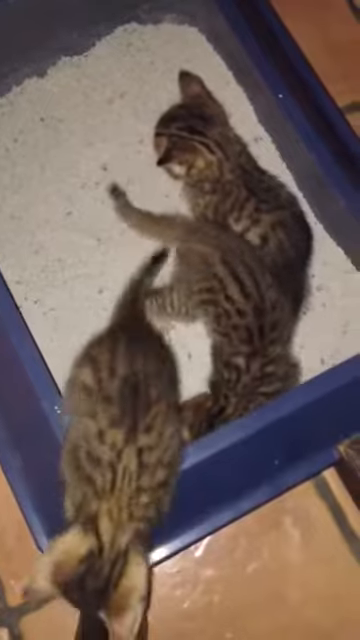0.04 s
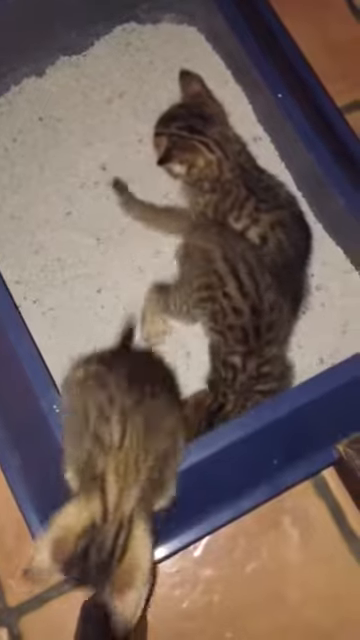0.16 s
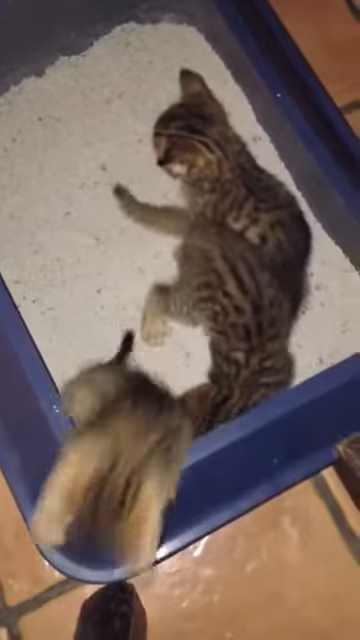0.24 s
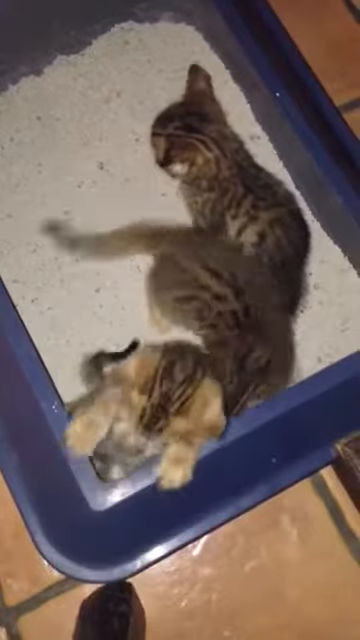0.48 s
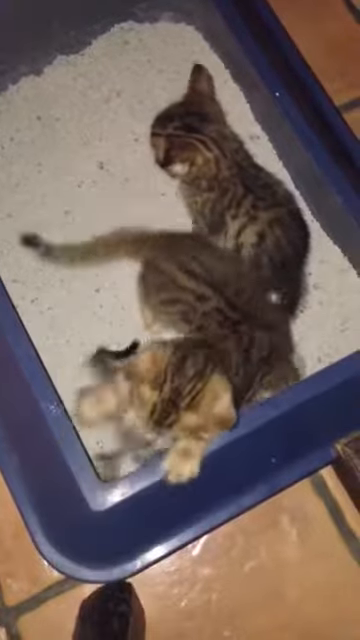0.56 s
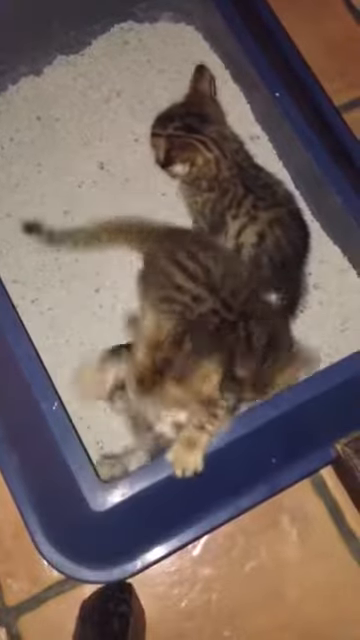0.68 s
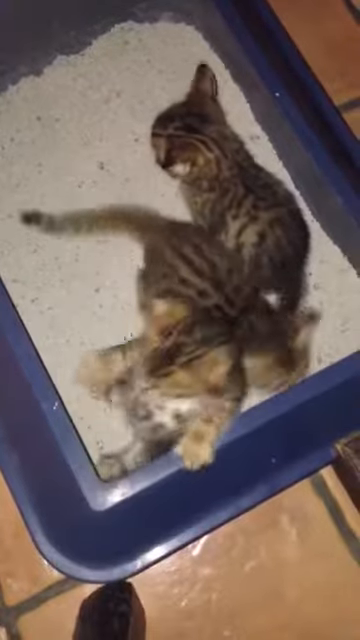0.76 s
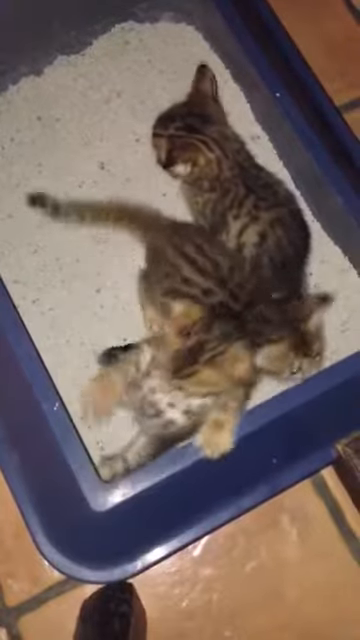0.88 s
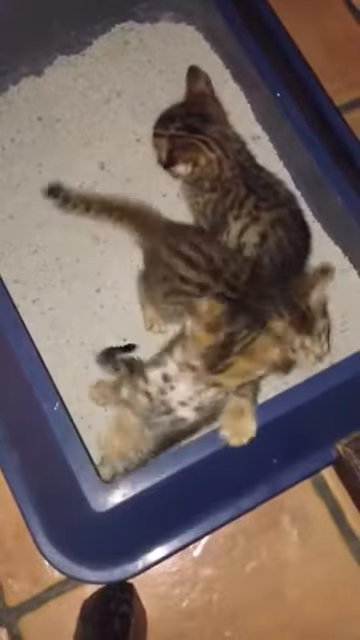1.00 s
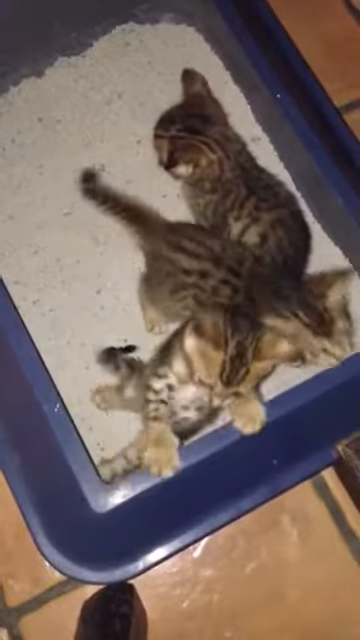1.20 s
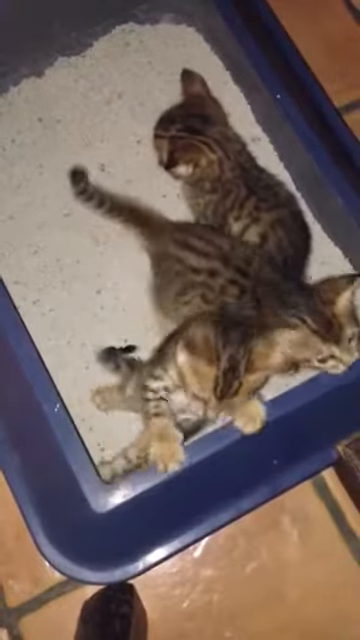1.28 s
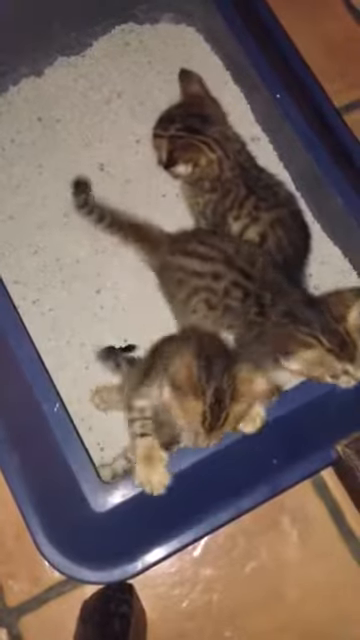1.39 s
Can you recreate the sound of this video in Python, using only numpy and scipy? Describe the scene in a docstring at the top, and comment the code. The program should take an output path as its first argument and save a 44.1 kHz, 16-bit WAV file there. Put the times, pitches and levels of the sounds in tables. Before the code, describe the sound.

Litter scuffs and plastic knocks as kittens tumble in their tray, over a low hum.

```python
"""A low hum fills a small tiled room; close to the microphone, litter scuffs in a plastic tray.
A kitten tumbles in, thumping the loaded tray floor, and wrestles with another.
Paws ring the thin wall, claws tick and rake, granules rub, crunch and drop, bodies bump softly.
The rustling goes on faintly over the hum, with a short echo off the tiles. Mono."""
import sys
import numpy as np
from scipy import signal
from scipy.fft import rfft, irfft, next_fast_len
from scipy.io import wavfile

SR = 44100
rng = np.random.default_rng(int(sys.argv[2]) if len(sys.argv) > 2 else 0)


def int16_out(signal):
    """Quantize to a 16-bit WAV file."""
    q = np.round(np.clip(np.atleast_2d(signal).T, -1, 1) * 32767)
    wavfile.write(sys.argv[1], SR, q.astype(np.int16))


N = 63945

# spectrum of the room air (frequency [Hz], relative level [dB])
AIR_COLOUR = [(20, -18), (45, -19), (100, -3.5), (160, -0.5), (280, 1.5), (500, -8.5), (1000, -11),
              (2000, -14), (4500, -14), (7500, -17.5), (10500, -21.5)]
# course of the deeper hum (time [s], level [dB])
DEEP_HUM_LEVEL = [(0, -55.5), (.2, -58.5), (.23, -66), (.32, -75), (.36, -62), (.53, -60), (.65, -70),
                  (.72, -56), (.8, -71.5), (.9, -67), (1.44, -63.5)]
# a light touch on the rim (time [s], level [dB])
RIM_CONTACT = (0.00098, -45.5)
# paws landing on the tray floor (time [s], thump level [dB], dull above [Hz], crunch level [dB])
PAW_LANDINGS = [(0.2240, -43.5, 825, -44), (0.2349, -27.5, 563, -40), (0.2497, -25, 1410, -35),
                (0.3375, -29.5, 127, -38.5)]
# paws and claws on the tray wall (time [s], knock level [dB], dull above [Hz], tick level [dB])
WALL_KNOCKS = [(0.5897, -37, 680, -49), (0.6685, -36.5, 2220, -20)]
# modes of the rim, loaded floor and thin wall (frequency [Hz], relative level [dB], t60 [s])
TRAY_RIM_MODES = [(368.5, -3.5, 0.22), (433, -3, 0.085)]
TRAY_FLOOR_MODES = [(112.8, -4, 0.13), (185, -21.5, 0.1), (255.4, -6, 0.27), (267, -13.5, 0.62),
                    (317.5, -14, 0.19), (361.3, -19.5, 0.54), (455.5, -8, 0.132), (534.6, 4.5, 0.041),
                    (575.6, -8, 0.26), (651, -10, 0.21), (858, -10.5, 0.064), (1029, -16.5, 0.11),
                    (1640, -7, 0.077)]
TRAY_WALL_MODES = [(188.3, -15.5, .55), (248, -0.5, 0.091), (315, -8, 0.14), (447, -2, 0.069),
                   (482, -5, .05), (670, -1.5, 0.024), (938, -3, 0.034), (1200, -2.5, 0.021),
                   (2280, 7, 0.033)]
# strokes through litter (peak time [s], level [dB], rise [s], fall [s], centre [Hz], width [octaves])
LITTER_SCUFFS = [(0.149, -56, 0.031, 0.009, 2600, 0.68), (0.200, -56.5, 0.045, 0.02, 900, 2.6),
                 (0.2417, -45, 0.0016, 0.0062, 4630, 0.95), (0.255, -41.5, 0.0044, 0.0075, 3540, 1.4),
                 (0.339, -41, 0.00093, 0.0052, 2170, 0.35), (0.3437, -35.5, 0.00052, 0.0027, 2280, 0.45),
                 (0.372, -52.5, 0.03, 0.031, 2600, 0.88), (0.407, -38, 0.024, 0.014, 2940, 0.69),
                 (0.447, -52.5, .012, 0.079, 4300, 0.59), (0.479, -52.5, 0.018, 0.019, 2400, 0.39),
                 (0.585, -54, 0.012, 0.011, 4200, .4), (0.593, -47.5, 0.011, 0.0074, 2130, 0.16),
                 (0.644, -54.5, 0.032, 0.058, 2440, 0.89), (0.699, -52.5, 0.012, 0.041, 3520, 0.35),
                 (0.930, -59.5, 0.024, 0.023, 3940, 0.42), (1.062, -58, 0.045, 0.039, 3840, 0.65),
                 (1.109, -59, 0.0092, 0.012, 3900, .6), (1.157, -57.5, 0.012, 0.0087, 3870, 0.68),
                 (1.224, -52.5, 0.011, 0.023, 3070, 1.12), (1.241, -45.5, 0.0025, 0.0084, 3360, 0.57),
                 (1.266, -52, 0.016, 0.014, 1820, 1.16), (1.340, -52.5, 0.0031, 0.011, 3050, 0.17),
                 (1.35, -51, 0.005, 0.007, 2700, 0.3), (1.361, -52.5, 0.018, 0.011, 3240, 0.68)]
# bodies meeting the litter bed (time [s], level [dB], width [s], centre [Hz])
BODY_BUMPS = [(0.179, -60, 0.021, 445), (0.352, -47.5, 0.022, 104.5), (0.405, -61.5, 0.035, 160),
              (0.935, -64.5, 0.033, 626), (1.056, -60, 0.028, 97), (1.172, -56, 0.022, 81),
              (1.275, -64, 0.0088, 646), (1.385, -64.5, 0.047, 87)]
# claws raking litter along the plastic (time [s], length [s], level [dB])
CLAW_RAKE = (0.4125, 0.0082, -30)
# resonances of that scrape (frequency [Hz], width [Hz], relative level [dB])
RAKE_RESONANCES = [(1328, 27, -7.5), (1880, 160, -3), (2320, 200, -6.5), (3320, 37, 1.5), (3230, 83, -2.5),
                   (4390, 245, 3), (5070, 25, -23), (4990, 86, -1), (6150, 710, -7), (8650, 940, -18)]
# reflections of a tick off the other tray walls (delay [s], relative level [dB])
TICK_ECHOES = [(.0032, -16), (.0075, -23.5), (0.0133, -26)]
# single granules dropping on plastic (time [s], level [dB])
GRANULE_DROPS = [(0.8757, -46.5), (0.893, -50.5), (1.066, -48), (1.114, -46.5), (1.131, -46)]
# spectra of rubbed litter, a crunch, a claw tick and a granule (frequency [Hz], relative level [dB])
LITTER_COLOUR = [(100, 14.5), (400, 12.5), (900, 9.5), (1400, 5.5), (2200, 4.5), (4500, 4), (7000, -1.5),
                 (9000, 2), (11000, -11)]
CRUNCH_COLOUR = [(60, -42), (250, 15), (700, 12), (1300, -5), (2300, 9), (3500, -6.5), (6000, -4.5),
                 (9000, -18), (11000, -25)]
TICK_COLOUR = [(60, -45), (250, -18), (900, 3.5), (1600, -8), (2400, -2), (3500, -5.5), (5000, -2),
               (6300, 3.5), (7600, -10.5), (9000, -0.5), (11000, -30)]
GRANULE_COLOUR = [(300, 7), (1500, -14.5), (3000, 0.5), (5000, -1), (7000, -9.5), (11000, -20)]
# reverberation of the tiled room (frequency [Hz], t60 [s])
ROOM_DECAY = [(100, 0.48), (400, 0.55), (1500, 0.28), (4500, 0.19), (10000, 0.31)]

BEND_DELAY_S, BEND_LEAD_S = 0.006, 0.0035  # bending-wave travel at 1 kHz; advance to meet the contact
BASS_LEAK_HZ = 135  # the open tray hardly radiates below this
LITTER_ROOM_DB, CLICK_ROOM_DB, TRAY_ROOM_DB = -8.5, -7, -14.5  # sends to the room


def amp(db):
    """Decibels to gain."""
    return 10 ** (np.asarray(db) / 20)


def unit(x):
    """Scales to rms 1."""
    return x / np.sqrt(np.mean(x ** 2) + 1e-20)


def read(points, hz):
    """Reads a table on a log-frequency axis."""
    f, value = np.transpose(points)
    return np.interp(np.log(hz + 1), np.log(f + 1), value)


def shaped(x, response):
    """Filters x by a function of frequency."""
    size = next_fast_len(2 * N)
    return irfft(rfft(x, size) * response(np.fft.rfftfreq(size, 1 / SR)), size)[:N]


def noise(response):
    """Noise of rms 1, coloured by a function of frequency."""
    return unit(shaped(rng.standard_normal(N), response))


def hump(f, centre_hz, octaves):
    """A bell-shaped band on a log-frequency axis."""
    return np.exp(-0.5 * (np.log2((f + 1) / centre_hz) / octaves) ** 2)


def lowpass(f, cutoff_hz):
    """Gain that falls 12 dB an octave above the cutoff."""
    return (1 + (f / cutoff_hz) ** 4) ** -0.5


def since(s):
    """Seconds since the moment s, for every sample."""
    return np.arange(N) / SR - s


def hum(hz, waver=0.4, waver_hz=11):
    """A low tone that wavers in level and pitch."""
    slow = lambda f: np.exp(-(f / waver_hz) ** 2)
    swell, slip = waver * noise(slow), waver * noise(slow)
    return unit((1 + swell) * np.sin(2 * np.pi * hz * since(0) + slip))


def room_tone():
    """Steady air around the microphone and two low hums, the deeper one coming and going."""
    air = amp(-60.5) * noise(lambda f: amp(read(AIR_COLOUR, f)))
    deep_db = np.interp(since(0), *np.transpose(DEEP_HUM_LEVEL))
    return air + amp(deep_db) * hum(hz=56) + amp(-66.5) * hum(hz=99.2)


def paw_blow(s, db, modes, dull_hz):
    """A soft paw rings the plastic; low bending waves travel slowest, so the bass comes last."""
    t = np.maximum(since(s), 0)
    ring = sum(amp(level - 60 * t / t60) * np.sin(2 * np.pi * hz * t) for hz, level, t60 in modes)
    bend = lambda f: np.exp(2j * np.pi * (f * BEND_LEAD_S - 2 * BEND_DELAY_S * np.sqrt(1000 * f)))
    bass_leak = lambda f: (1 + (BASS_LEAK_HZ / (f + 1)) ** 12) ** -0.5
    return amp(db) * shaped(ring, lambda f: bend(f) * lowpass(f, dull_hz) * bass_leak(f))


def tray():
    """The hollow ring of the tray's rim, floor and wall under the paws."""
    rim = paw_blow(*RIM_CONTACT, TRAY_RIM_MODES, dull_hz=900)
    floor = sum(paw_blow(s, db, TRAY_FLOOR_MODES, hz) for s, db, hz, _ in PAW_LANDINGS)
    wall = sum(paw_blow(s, db, TRAY_WALL_MODES, hz) for s, db, hz, _ in WALL_KNOCKS)
    return rim + floor + wall


def grains(per_s=9000, spread_db=2.5):
    """Shifting litter: a dense train of tiny clicks of uneven size."""
    size = amp(spread_db * np.minimum(rng.exponential(1, N), 4))
    return size * rng.choice([-1, 1], N) * (rng.random(N) < per_s / SR)


def scuff(s, db, rise_s, fall_s, centre_hz, octaves, skirt_db=-13.5):
    """Granules rub under a paw; the stroke swells and fades."""
    t = since(s)
    colour = lambda f: (hump(f, centre_hz, octaves) + amp(skirt_db)) * amp(read(LITTER_COLOUR, f))
    envelope = np.exp(-abs(t) / np.where(t < 0, rise_s, fall_s))
    return amp(db) * envelope * unit(shaped(grains(), colour))


def body_bump(s, db, width_s, centre_hz):
    """A body meets the litter bed: a muffled low swell without an attack."""
    envelope = np.exp(-(since(s) / width_s) ** 2)
    return amp(db) * envelope * noise(lambda f: hump(f, centre_hz, octaves=0.26))


def burst(s, db, colour, decay_s):
    """A brief contact: sudden coloured noise that dies at once."""
    t = since(s)
    envelope = (t >= 0) * np.exp(-abs(t) / decay_s)
    return amp(db) * envelope * noise(lambda f: amp(read(colour, f)))


def litter_crunch():
    """Litter crunches under each landing paw."""
    return sum(burst(s, db, CRUNCH_COLOUR, decay_s=0.0057) for s, _, _, db in PAW_LANDINGS)


def claw_rake(s, length_s, db, rise_s=0.0026, fall_s=0.013):
    """Claws drag granules over the plastic: a short, bright, ringing scrape."""
    t = since(s)
    power = lambda f: sum(amp(level) ** 2 / (1 + (2 * (f - hz) / width) ** 2)
                          for hz, width, level in RAKE_RESONANCES)
    envelope = np.clip(t / rise_s, 0, 1) * np.exp(-np.maximum(t - length_s, 0) / fall_s)
    return amp(db) * envelope * unit(shaped(grains(), lambda f: np.sqrt(power(f))))


def claw_ticks(decay_s=0.0013):
    """Claws tick on one wall of the tray and echo off the others."""
    direct = sum(burst(s, db, TICK_COLOUR, decay_s) for s, _, _, db in WALL_KNOCKS)
    echoes = sum(burst(s + delay_s, db + echo_db, TICK_COLOUR, decay_s)
                 for s, _, _, db in WALL_KNOCKS for delay_s, echo_db in TICK_ECHOES)
    return direct + echoes


def stray_granules():
    """Sprayed granules click on the plastic one by one."""
    return sum(burst(s, db, GRANULE_COLOUR, decay_s=0.0015) for s, db in GRANULE_DROPS)


def tiled_room(x, delay_s=0.0024):
    """Dense reflections off the tiles reach the microphone just after x, the treble dying first."""
    hz, t, spectrum = signal.stft(rng.standard_normal(SR // 2), SR, nperseg=256)
    decay = amp(-60 * t / read(ROOM_DECAY, hz)[:, None])
    tail = signal.istft(spectrum * decay, SR, nperseg=256)[1]
    tail *= np.clip(np.arange(len(tail)) / SR / delay_s - 1, 0, 1)  # a gap, then a fade in
    return signal.fftconvolve(x, tail / np.linalg.norm(tail))[:N]


def scene():
    """Tray and litter close to one microphone, with the room around them."""
    thumps = tray()
    clicks = litter_crunch() + claw_ticks() + stray_granules()
    litter = claw_rake(*CLAW_RAKE) + sum(scuff(*row) for row in LITTER_SCUFFS)
    bumps = sum(body_bump(*row) for row in BODY_BUMPS)
    dulled = shaped(clicks, lambda f: lowpass(f, cutoff_hz=5300))  # a click's echo is duller
    send = amp(LITTER_ROOM_DB) * litter + amp(CLICK_ROOM_DB) * dulled + amp(TRAY_ROOM_DB) * thumps
    return (thumps + clicks + litter + bumps + tiled_room(send) + room_tone())[None]


def record(dry, edge_hz=10750):
    """The recorder behind the microphone cuts off the top of the treble."""
    band_limit = signal.firwin(401, edge_hz, window=("kaiser", 8), fs=SR)
    return signal.oaconvolve(dry, band_limit[None], "same")


dry = scene()
out = record(dry)
int16_out(out)
```